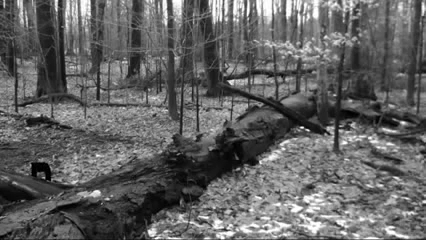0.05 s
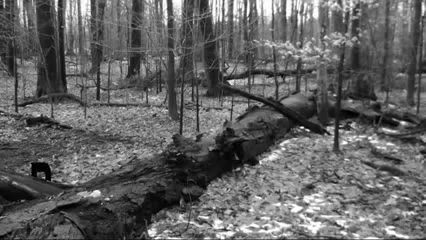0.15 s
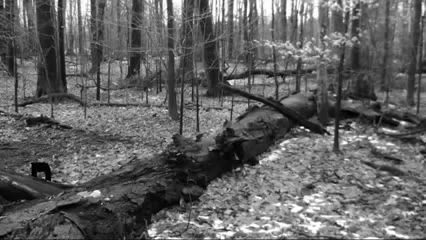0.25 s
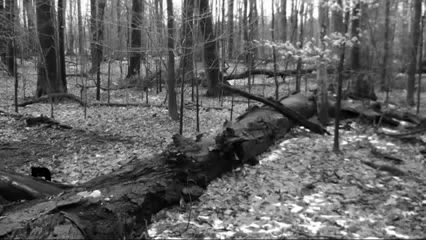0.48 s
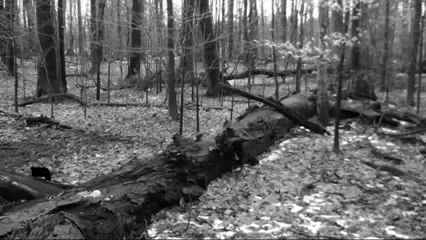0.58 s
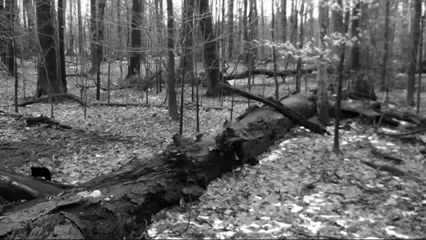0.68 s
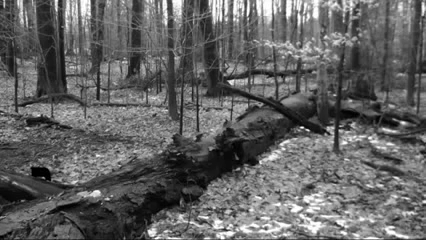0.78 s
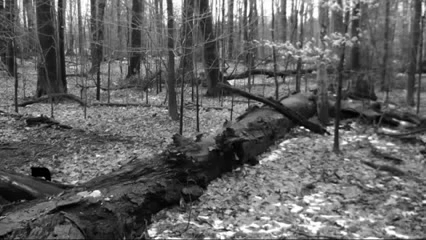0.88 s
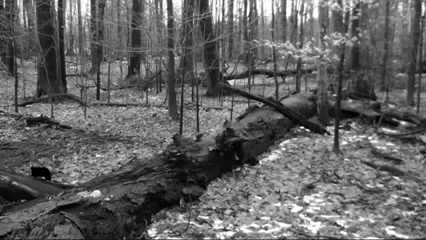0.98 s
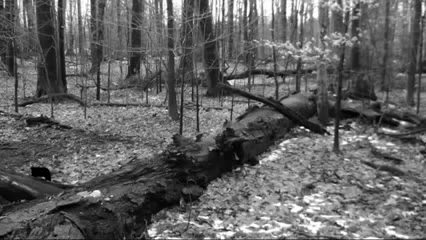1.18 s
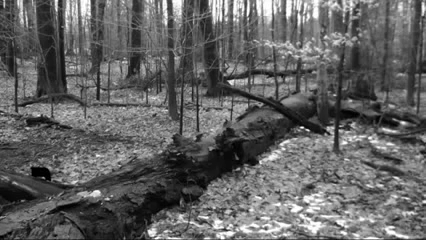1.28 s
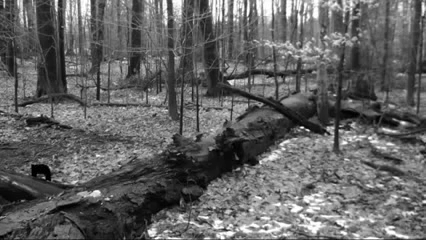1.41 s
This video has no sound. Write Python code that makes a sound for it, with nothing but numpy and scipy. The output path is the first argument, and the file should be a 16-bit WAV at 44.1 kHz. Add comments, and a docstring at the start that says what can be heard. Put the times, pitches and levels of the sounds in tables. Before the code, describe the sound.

Two low, dull wing thumps from a nearby grouse, with songbirds whistling faintly far away.

```python
"""Two deep, soft thumps, half a second apart: a ruffed grouse beats its wings on a log close by.
Each beat pushes one pulse of air, with a hollow puff of eddies and a swish and flick of feathers,
and the trunks throw the pulse faintly back. Far songbirds whistle and chirp in the echoing wood
over a low rumble of air."""
import sys
import numpy as np
from scipy import signal
from scipy.fft import rfft, irfft
from scipy.io import wavfile

SR = 44100
rng = np.random.default_rng(int(sys.argv[2]) if len(sys.argv) > 2 else 0)


def bounce(signal):
    """Save signal as a 16-bit WAV file at the path given by the first command-line argument."""
    frames = np.transpose(np.atleast_2d(signal))
    limited = np.clip(frames, -1, 1)
    pcm = np.round(limited * 32767).astype(np.int16)
    wavfile.write(sys.argv[1], SR, pcm)


N = 63945

# The wing beats. Each row: time in seconds, thump level in dB, thump length as a ratio,
# level of the feathers and eddies in dB.
BEATS = [(.2107, -4.4, 1.0, 0), (.7153, -6.5, 1.025, -2.5)]
RUSH_LEAD_S = .003  # the swish and the puff peak just ahead of each beat
FEATHER_WIDTH = .22  # side over mid


def undb(db):
    """Turn decibels into a gain."""
    return 10 ** (np.asarray(db) / 20)


def unit(x):
    """Scale to rms 1."""
    return x / np.sqrt(np.mean(x ** 2))


def pan(db):
    """Left and right gains, the left louder by db."""
    return undb(np.array([[db], [-db]]) / 2)


def widen(mid, side, width):
    """Stereo pair: the side signal is added on the left and subtracted on the right."""
    return mid + width * side * np.array([[1], [-1]])


def noise(points):
    """Noise of rms 1, its spectrum shaped by (Hz, dB) points."""
    hz, db = np.array(points, float).T
    f = np.maximum(np.arange(N // 2 + 1) * SR / N, 1)
    gain = undb(np.interp(np.log(f), np.log(hz), db))
    return unit(irfft(rfft(rng.standard_normal(N)) * gain, N))


def band(hz, width_hz):
    """Noise of rms 1 in one bell-shaped band."""
    f = np.arange(N // 2 + 1) * SR / N
    bell = np.exp(-.5 * ((f - hz) / width_hz) ** 2)
    return unit(irfft(rfft(rng.standard_normal(N)) * bell, N))


def swell(u, rise_s, fall_s):
    """Exponential rise to u = 0 and fall after it."""
    return np.exp(-np.abs(u) / np.where(u < 0, rise_s, fall_s))


def echoes(x, t60_s):
    """Dense reflections from many trunks, different left and right."""
    t = np.arange(N) / SR
    build_up = 1 - np.exp(-t / .0073)
    tail = rng.standard_normal((2, N)) * np.exp(-np.log(1000) * t / t60_s) * build_up
    return signal.fftconvolve(x[None], unit(tail) / np.sqrt(N), axes=1)[:, :N]


def forest_air(t):
    """A slowly ebbing rumble, nearly alike on both sides, under a faint, wider hiss."""
    # The tone of the air. Each row: frequency in Hz, relative level in dB.
    air_spectrum = [(20, 2.5), (50, -5.5), (120, -13.5), (200, -22.5), (330, -30.5), (552, -36),
                    (1000, -37), (1700, -40.5), (2300, -33.5), (3100, -39), (3600, -44), (5700, -49.5),
                    (7800, -48), (10000, -60.5)]
    rumble_top_hz, ebb_db_per_s = 300, 4
    f = np.arange(N // 2 + 1) * SR / N
    width = np.interp(f, [100, 1500], [.067, .6])
    air = widen(rfft(noise(air_spectrum)), rfft(noise(air_spectrum)), width)
    rumble = irfft(air * (f < rumble_top_hz), N)
    hiss = irfft(air * (f >= rumble_top_hz), N)
    ebb = undb(-ebb_db_per_s * (t - t.mean()))
    return undb(-60.5) * (hiss + rumble * ebb)


def far_birds(t):
    """Songs from so far away that only their echo arrives, blurred by the wood to narrow bands."""
    # The farthest songs. Each row: peak time, rise and fade in seconds, pitch and width in Hz,
    # level in dB.
    far_songs = [(.03, 0.045, 0.068, 2993, 35, -75.5), (0.159, 0.028, 0.15, 2324, 60, -72.5),
                 (0.389, .05, 0.093, 3020, 109.5, -75.5), (0.449, 0.093, 0.035, 2064, 35.7, -78.5),
                 (.57, 0.03, 0.14, 2205, 80.7, -76), (.78, 0.065, 0.15, 2630, 182.3, -78.5),
                 (1.124, .05, 0.14, 2970, 283, -73.5), (1.11, .05, 0.11, 2210, 88.6, -75),
                 (1.25, 0.049, 0.15, 2256, 71, -72), (1.3, 0.041, 0.057, 1904, 90, -76)]
    songs = 0
    for at, rise, fade, hz, width, db in far_songs:
        blur = np.array([band(hz, width), band(hz, width)])
        songs = songs + undb(db) * swell(t - at, rise, fade) * blur
    chorus = np.array([band(3259, 45) for _ in range(2)])  # the whistlers' echo never quite dies
    return songs + undb(-76) * chorus * pan(2.5)


def songbird(t, notes, pan_db, echo_db, waver):
    """Pure gliding notes that waver slightly, reach the left side first and ring on in the wood."""
    edge_s, right_lag_s = .01, .000045
    song = np.zeros(N)
    for at, length, start_hz, end_hz, db in notes:
        glide_hz = np.interp(t, [at, at + length], [start_hz, end_hz])
        hz = glide_hz * (1 + waver * band(0, 50))
        inside_s = np.minimum(t - at, at + length - t)
        gate = np.sin(np.pi / 2 * np.clip(inside_s / edge_s, 0, 1))
        song += undb(db) * gate * np.sqrt(2) * np.sin(2 * np.pi * np.cumsum(hz) / SR)
    direct = np.array([song, np.interp(t - right_lag_s, t, song)])
    ring = echoes(song, t60_s=.8) * pan(2)  # the echo leans to the birds' side
    return direct * pan(pan_db) + undb(echo_db) * ring


def songbirds(t):
    """Three birds off to the left: the nearest whistles, one slurs chirps, one sings thin and high."""
    # The notes of each bird. Each row: start and length in seconds, first and last pitch in Hz,
    # level in dB.
    whistles = [(-.03, 0.07, 3234, 3310, -82), (0.052, 0.12, 3290, 3248, -71.5),
                (0.179, 0.11, 3337, 3265, -80), (.33, 0.038, 3220, 3324, -71.5),
                (0.363, 0.045, 3331, 3309, -65), (0.397, 0.12, 3290, 3295, -70.5),
                (.585, 0.073, 3325, 3320, -73.5), (.71, 0.033, 3330, 3340, -71),
                (0.756, 0.025, 3336, 3305, -65), (0.781, 0.075, 3320, 3300, -74.5),
                (0.849, 0.053, 3180, 3177, -73.5), (0.956, .05, 3367, 3315, -72),
                (1.004, 0.072, 3315, 3290, -69.5), (1.085, .04, 3255, 3270, -74.5),
                (1.261, 0.048, 3204, 3210, -75.5), (1.372, 0.056, 3282, 3270, -76),
                (1.427, 0.038, 3170, 3260, -74.5)]
    chirps = [(.5, 0.026, 2946, 2710, -73), (0.521, 0.031, 2954, 2730, -70.5),
              (0.549, 0.031, 2915, 2646, -80), (0.635, 0.039, 3075, 3142, -70),
              (0.656, .05, 3055, 2600, -70), (0.746, .06, 2563, 2593, -76), (.86, 0.063, 2660, 2637, -87.5)]
    high_notes = [(-.01, 0.078, 3900, 3862, -72), (0.062, 0.079, 4067, 4095, -73.5),
                  (.075, .07, 3950, 4030, -74.5), (.135, 0.043, 4040, 4026, -66.5),
                  (0.184, .055, 4050, 4056, -66), (0.237, 0.04, 4006, 3960, -71),
                  (1.125, 0.079, 3560, 3570, -90), (1.144, 0.059, 3900, 3920, -87)]
    return (songbird(t, whistles, pan_db=10, echo_db=-8, waver=.003)
            + songbird(t, chirps, pan_db=11, echo_db=-1.5, waver=.0088)
            + songbird(t, high_notes, pan_db=9, echo_db=-2.5, waver=.0084))


def rustles(t):
    """Feathers and dry leaves stir in tiny, bright rustles."""
    # The rustles. Each row: peak time in seconds, level in dB.
    stirs = [(.406, -81), (0.743, -77)]
    fall_s = .0067
    envelope = sum(undb(db) * swell(t - at, fall_s / 2, fall_s) for at, db in stirs)
    return envelope * band(6000, 1380)


def feather_swish(t):
    """Air rushes through the feathers at the fastest part of the stroke and trails off as they settle."""
    # The tone of the swish. Each row: frequency in Hz, relative level in dB.
    swish_spectrum = [(150, -0.5), (550, 3.5), (850, -1.5), (1400, -1), (2500, -2), (4200, -13),
                      (7000, -14.5), (8500, -19), (10000, -31.5)]
    rise_s, fall_s, settle_s = .012, .014, .034
    rush = 0
    for at, _, _, db in BEATS:
        u = t - at + RUSH_LEAD_S
        settling = undb(-3.5) * swell(u, rise_s, settle_s)
        rush = rush + undb(db) * (swell(u, rise_s, fall_s) + settling)
    swish = widen(noise(swish_spectrum), noise(swish_spectrum), FEATHER_WIDTH)
    return undb(-59) * rush * swish


def feather_snaps(t):
    """A crisp, fluttering flick of the flight feathers at the turn of each stroke."""
    # The tone of the flick. Each row: frequency in Hz, relative level in dB.
    snap_spectrum = [(500, 0), (900, -5), (1300, 4), (2200, -3), (4000, -7), (7500, -12.5), (10000, -29)]
    lead_s, half_length_s = .0027, .0063
    flick = sum(undb(db) * np.exp(-.5 * ((t - at + lead_s) / half_length_s) ** 4)
                for at, _, _, db in BEATS)
    flutter = unit(np.exp(.25 * band(0, 400)))
    snap = widen(noise(snap_spectrum), noise(snap_spectrum), FEATHER_WIDTH)
    return undb(-57.5) * flick * flutter * snap


def wing_whoosh(t):
    """Eddies shed by the wing add a short, hollow puff to each thump."""
    rise_s, fall_s = .0097, .021
    eddy_hz, width_hz = 239, 206
    puff = 0
    for at, _, _, db in BEATS:
        u = t - at + RUSH_LEAD_S
        puff = puff + undb(db) * np.exp(np.where(u < 0, u / rise_s, -.5 * (u / fall_s) ** 2))
    eddies = widen(band(eddy_hz, width_hz), band(eddy_hz, width_hz), width=.1)
    return undb(-48) * puff * eddies


def trunk_reflections(t, pressure):
    """A near and a far trunk throw each thump back; the rest scatter all but its longest waves."""
    # The two clear echoes. Each row: delay in seconds, level in dB, left over right in dB.
    trunk_echoes = [(.0121, -17.5, 4), (.118, -41, 0)]
    thrown = sum(undb(db) * pan(side_db) * np.interp(t - delay, t, pressure)
                 for delay, db, side_db in trunk_echoes)
    short_waves = signal.sosfilt(signal.butter(2, 170, "high", fs=SR, output="sos"), pressure)
    return thrown + undb(-29) * echoes(short_waves, t60_s=.33)


def wing_thumps(t):
    """Each stroke drives a flow of air; the change in that flow is the thump, echoed by the trunks."""
    swing_s, brake_s, turn_s = .0039, .0061, .00275  # the wing gathers speed fast, brakes more slowly
    spread_s, spread_lead_s = .0059, .0051  # the opening wing pushes a little earlier
    flow = 0
    for at, db, length, _ in BEATS:
        u = (t - at) / length
        braking = (1 + np.tanh(u / turn_s)) / 2
        width = swing_s + (brake_s - swing_s) * braking
        stroke = np.exp(-.5 * (u / width) ** 2)
        spread = .27 * np.exp(-.5 * ((u + spread_lead_s) / spread_s) ** 2)
        flow = flow + undb(db) * (stroke + spread)
    pressure = np.gradient(flow) * SR * .005
    return pressure * pan(-1.3) + trunk_reflections(t, pressure)


def scene():
    """The grouse up close, near the centre, with the birds and the air of the wood behind it."""
    t = np.arange(N) / SR
    grouse = wing_thumps(t) + wing_whoosh(t) + feather_swish(t) + rustles(t) + feather_snaps(t)
    return grouse + songbirds(t) + far_birds(t) + forest_air(t)


def record(dry):
    """The microphone's bass roll-off makes each thump swing back slowly; the top is cut."""
    mic_hz, damping, coupling_hz, top_hz = 8.6, 1.1, 11.6, 10000
    w = 2 * np.pi * mic_hz
    x = signal.lfilter(*signal.bilinear([1, 0, 0], [1, w * damping, w * w], SR), dry)
    x = signal.lfilter(*signal.butter(1, coupling_hz, "high", fs=SR), x)
    return signal.sosfilt(signal.ellip(8, .2, 70, top_hz, fs=SR, output="sos"), x)


dry = scene()
out = record(dry)
bounce(out)
```